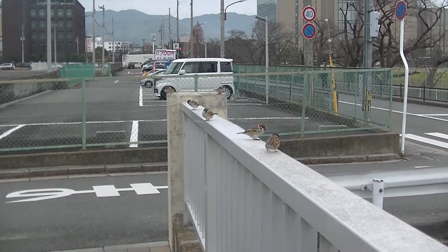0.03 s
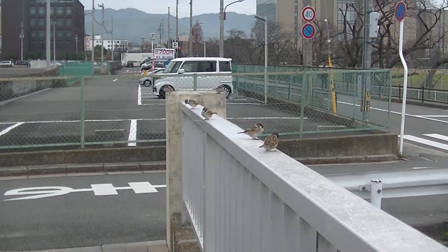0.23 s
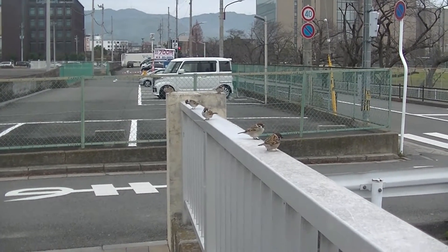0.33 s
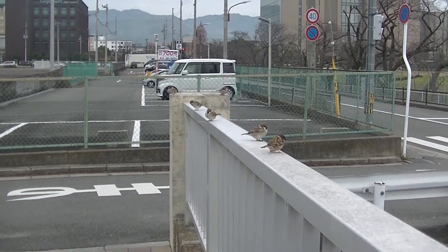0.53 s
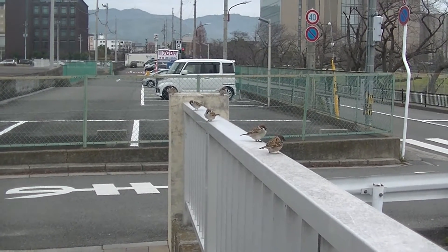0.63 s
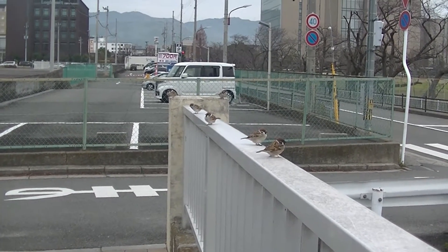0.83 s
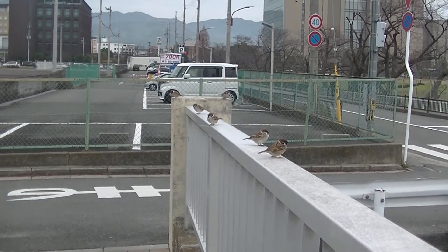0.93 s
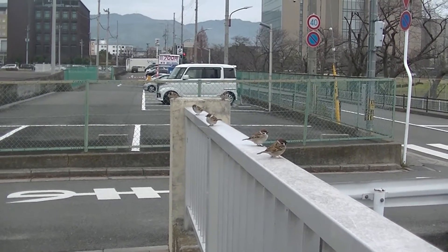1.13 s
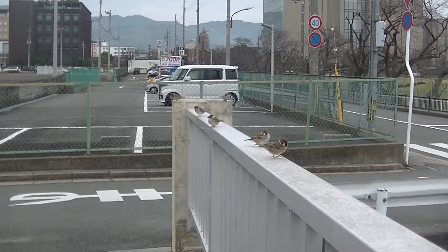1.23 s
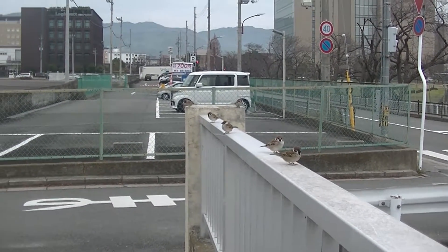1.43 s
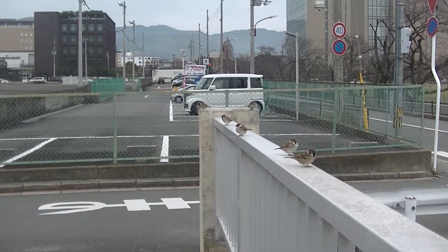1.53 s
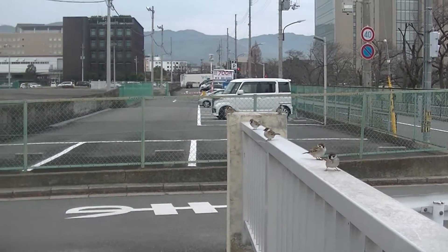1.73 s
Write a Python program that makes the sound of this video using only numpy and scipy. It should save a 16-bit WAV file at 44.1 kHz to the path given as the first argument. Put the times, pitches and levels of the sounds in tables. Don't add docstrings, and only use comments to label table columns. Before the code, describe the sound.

A nearby sparrow makes six short, rough, falling or arching chirps in under two seconds, with tiny beak ticks. Distant birds peep, a vehicle passes faintly, and steady town hum lies beneath; outdoor stereo, close bird.

```python
import sys
import numpy as np
from scipy import signal
from scipy.fft import rfft, irfft
from scipy.io import wavfile

SR = 44100
rng = np.random.default_rng(int(sys.argv[2]) if len(sys.argv) > 2 else 0)


def voltage_ratio(level):
    return 10 ** (np.asarray(level, float) / 20)


def wrap_up_sound(samples):
    columns = np.atleast_2d(samples).T
    tamed = np.clip(columns, -1, 1)
    steps = np.round(tamed * 32767).astype(np.int16)
    wavfile.write(sys.argv[1], SR, steps)


N = 79380
T = np.arange(N) / SR
BIN_HZ = np.arange(N // 2 + 1) * SR / N + 1


def rms_one(x):
    return x / np.sqrt(np.mean(np.abs(x) ** 2) + 1e-20)


def along(points, x):
    return np.interp(x, *np.transpose(points))


def along_pitch(points, hz):
    point_hz, value = np.transpose(points)
    return np.interp(np.log(hz), np.log(point_hz), value)


def tint(x, points):
    return irfft(rfft(x) * voltage_ratio(along_pitch(points, BIN_HZ)), N)


def flutter(rate_hz):
    settle = 9000
    r = np.exp(-2 * np.pi * rate_hz / SR)
    white = rng.standard_normal((2, N + settle))
    slow = signal.lfilter([1], [1, -2 * r, r * r], white[0] + 1j * white[1])
    return rms_one(slow[settle:])


def tone(hz):
    return np.exp(2j * np.pi * np.cumsum(hz + np.zeros(N)) / SR)


def sparrow():
    # [t/s, f/Hz, level/dB]
    falling = [
        [(.2125, 6517, -24), (.222, 5150, -27.5), (.24, 4710, -21.5), (.27, 4340, -27), (.3, 3797, -26),
         (.311, 2796, -33), (.324, 2254, -43)],
        [(.924, 5364, -26.5), (.936, 4470, -26.5), (.982, 3865, -22), (.99, 3600, -30.5), (1.012, 2405, -34),
         (1.024, 2000, -63)],
        [(1.193, 5260, -30.5), (1.203, 4150, -28.5), (1.232, 3948, -25.5), (1.272, 3856, -26),
         (1.288, 3200, -37.5), (1.302, 2393, -34), (1.312, 2200, -45)],
        [(1.4865, 4900, -26.5), (1.496, 4065, -27), (1.52, 3773, -22.5), (1.558, 3555, -27), (1.575, 2770, -30),
         (1.585, 2189, -44.5), (1.596, 2010, -49)],
    ]
    # [t/s, f/Hz, level/dB]
    arched = [
        [(.422, 6335, -29.5), (.429, 5050, -22.5), (.452, 4900, -18.5), (.463, 5050, -25), (.473, 5200, -21.5),
         (.488, 5263, -18), (.504, 4900, -32.5), (.512, 3620, -37), (.522, 2380, -43)],
        [(.674, 5893, -24), (.686, 4743, -24), (.712, 5070, -14.5), (.735, 5355, -16), (.752, 5000, -19.5),
         (.765, 3830, -25.5), (.771, 2300, -36.5), (.78, 1901, -45)],
    ]
    # [throat level/dB, hiss level/dB]
    breath_levels = [(-10, -19.5), (-8, -23.5), (-7, -28), (-8.5, -26.5), (-12, -19), (-8.5, -22.5)]
    # [f/Hz, level/dB per Hz]
    throat_colour = [(1200, -21.5), (2200, -6), (3000, -14.5), (3700, 1), (5000, 5.5), (6500, -5.5),
                     (7300, -27), (9000, -26)]
    # [f/Hz, level/dB per Hz]
    hiss_colour = [(5000, -30), (7500, -3), (10000, -5), (12000, 0), (13800, 4), (14800, -2), (16000, -18)]
    # [f/Hz, level/dB]
    path = [(1500, -1.5), (2300, 4), (2900, 0.5), (3350, -6), (3600, -2.5), (6600, 2), (7300, 0.5),
            (16000, -4.5)]
    # [t/s, level/dB]
    wheeze_swell = [(.235, -75), (.262, -40), (.295, -37), (.322, -63), (.33, -87)]
    attack_s, tail_hz, tail_loss_db = .0007, 4300, 9
    clear_share, rasp_limit = .35, .15
    loud_db, breath_follows = -24, .9

    hz = np.full(N, 4e3)
    gain, throat, hiss = np.zeros((3, N))
    for rows, (throat_db, hiss_db) in zip(falling + arched, breath_levels):
        s, pitch, db = np.transpose(rows)
        on = (T >= s[0]) & (T < s[-1])
        hz[on] = np.interp(T[on], s, pitch)
        attack = np.clip((T[on] - s[0]) / attack_s, 0, 1)
        gain[on] = voltage_ratio(np.interp(T[on], s, db)) * attack
        throat[on], hiss[on] = voltage_ratio(throat_db), voltage_ratio(hiss_db)

    shake_hz = .018 * hz + .24 * np.maximum(tail_hz - hz, 0)
    whistle = tone(hz + shake_hz * flutter(220).real)
    rasp = np.sqrt(clear_share) + np.sqrt(1 - clear_share) * flutter(210)
    rasp = rasp + voltage_ratio(-9) * flutter(850)
    rasp = rms_one(rasp / (1 + rasp_limit * np.abs(rasp)))

    throat_noise = throat * rms_one(tint(rng.standard_normal(N), throat_colour))
    hiss_noise = hiss * rms_one(tint(rng.standard_normal(N), hiss_colour))
    breath = voltage_ratio(loud_db) * (gain / voltage_ratio(loud_db)) ** breath_follows
    wheeze = voltage_ratio(along(wheeze_swell, T)) * (flutter(480) * tone(11800)).real

    throb = rms_one(1 + .45 * tone(230 * (1 + .35 * flutter(60).real)).imag)
    tail_loss = voltage_ratio(-tail_loss_db * np.clip(1 - hz / tail_hz, 0, 1))
    voice = np.sqrt(2) * gain * throb * tail_loss * (rasp * whistle).real
    return tint(voice + breath * (throat_noise + hiss_noise), path) + wheeze


def beak():
    # [t/s, level/dB]
    ticks = [
        (.211, -37),
        (0.42, -31),
        (.6735, -49),
        (0.9231, -28.5),
        (1.482, -28.5),
    ]
    tick_s = .0008
    burst = sum(voltage_ratio(db) * np.exp(-((T - s) / tick_s) ** 2) for s, db in ticks)
    bright = signal.butter(4, 7940, "high", fs=SR, output="sos")
    return burst * signal.sosfilt(bright, rng.standard_normal(N))


def spread(x):
    # [f/Hz, level/dB]
    bird_pan = [(1500, -1), (2600, .5), (3300, 3), (3900, 5.5), (4600, 2.5), (5200, 1.8), (8000, -1),
                (13000, -3)]
    # [f/Hz, phase/rad]
    bird_lead = [(0, 0), (3270, 0.8), (3530, 0.56), (7240, 0.5), (8440, 1.59), (10900, 0.35), (15600, 5.5),
                 (16100, 0.1)]
    hz, lead = np.transpose(bird_lead)
    turn = np.interp(np.log(BIN_HZ), np.log(np.maximum(hz, 1e-300)), lead) / 2
    turn = np.where(BIN_HZ < hz[1], lead[1] / 2, turn)
    ears = []
    for side in (1, -1):
        balanced = tint(x, [(f, side * db / 2) for f, db in bird_pan])
        ears.append(irfft(rfft(balanced) * np.exp(1j * side * turn), N))
    return np.array(ears)


def echoes(x):
    t = T[:int(.25 * SR)]
    t60_s = .07
    tail = rng.standard_normal((2, len(t))) * voltage_ratio(-60 * t / t60_s)
    tail = rms_one(tail) / np.sqrt(len(t))
    return voltage_ratio(-17) * signal.fftconvolve(x[None], tail, axes=1)[:, :N]


def hum(colour, patchy_db):
    # [f/Hz, correlation]
    likeness = [(60, .99), (500, .97), (2000, .9), (5000, .75), (9000, .3), (15000, .1)]
    # [f/Hz, level/dB]
    town_pan = [(60, -2.5), (300, -2), (1000, -1), (4000, -2), (15000, 3)]
    total = 0
    centres = 20 * 2 ** np.arange(0, 10, .5)
    inside = (centres > colour[0][0] / 1.3) & (centres < colour[-1][0] * 1.3)
    white = rfft(tint(rng.standard_normal((2, N)), colour))
    for centre in centres[inside]:
        band = np.cos(np.clip(np.log2(BIN_HZ / centre), -.5, .5) * np.pi) ** 2
        mid, side = irfft(white * band, N)
        alike = np.clip(along_pitch(likeness, centre), 0, 1)
        pair = np.sqrt(1 + alike) * mid + np.sqrt(1 - alike) * side * [[1], [-1]]
        total = total + voltage_ratio(patchy_db * flutter(6.3).real) * pair
    ears = [tint(ear, [(hz, s * db / 2) for hz, db in town_pan]) for ear, s in zip(total, (1, -1))]
    return rms_one(np.array(ears))


def vehicle():
    # [t/s, level/dB]
    swell = [
        (1.1, -58),
        (1.24, -39),
        (1.33, -39),
        (1.44, -41.5),
        (1.6, -58.5),
    ]
    # [f/Hz, level/dB per Hz]
    roar_colour = [(120, -23), (300, -9), (800, -15), (1500, -24.5), (3300, -20), (6000, -18), (7300, -31),
                   (14000, -45.5)]
    # [f/Hz on arrival, sag/Hz per s, level/dB]
    drones = [
        (303, -70, -5),
        (445, -140, -12),
    ]
    t = T - swell[1][0]
    revs = np.clip(1 + 4 * t, .7, 1)
    drone = 0
    for hz, sag, db in drones:
        waver = 1 + .5 * flutter(5)
        drone = drone + voltage_ratio(db) * (waver * tone((hz + sag * t) * revs)).real
    return voltage_ratio(along(swell, T)) * (hum(roar_colour, patchy_db=-1.0) + drone * voltage_ratio([[-1.2], [1.2]]))


def squeal():
    end_s, fade_s = .42, .05
    fade = np.clip((end_s - T) / fade_s, 0, 1)
    waver = 1 + .25 * flutter(9.0)
    return voltage_ratio(-50) * fade * (waver * np.exp(2j * np.pi * 2988 * T)).real


def far_birds():
    # [t/s, length/s, level/dB, f/Hz]
    peeps = [
        (0.02, 0.02, -60, 4400),
        (0.21, 0.032, -46, 4500),
        (0.415, 0.023, -53, 5500),
        (0.553, 0.029, -44, 4300),
        (.635, 0.045, -66, 5000),
        (0.845, 0.043, -42.5, 4000),
        (1.148, .015, -40, 3450),
        (1.706, 0.045, -46.5, 4800),
        (1.735, 0.014, -40, 3700),
    ]
    fall, pan_db = .04, -2
    total, rasp = np.zeros(N), .5 + flutter(200)
    for s, length, db, hz in peeps:
        u = (T - s) / length
        sagging = np.exp(2j * np.pi * hz * (T - fall * length * u ** 2 / 2))
        total += voltage_ratio(db) * np.exp(-4.0 * u ** 2) * (rasp * sagging).real
    return total * voltage_ratio([[pan_db / 2], [-pan_db / 2]])


def flock():
    # [f/Hz, level/dB per Hz]
    flock_colour = [(2400, -10), (3300, 11.5), (4200, -11), (5200, -6.5), (6500, -35)]
    return voltage_ratio(-65) * hum(flock_colour, patchy_db=5.0)


def town():
    # [f/Hz, level/dB per Hz]
    town_colour = [(25, -33), (117, -6), (330, -5), (820, -14.5), (1500, -17), (4500, -16), (7000, -36),
                   (16000, -45)]
    return voltage_ratio(-41.5) * hum(town_colour, patchy_db=0.8)


def scene():
    bird = sparrow() + beak()
    near = spread(bird) + echoes(bird)
    return near + vehicle() + squeal() + far_birds() + flock() + town()


def top_cut(x):
    return signal.sosfilt(signal.butter(12, 16510, fs=SR, output="sos"), x)


def record(dry):
    low_pass = signal.cheby2(10, 50, 16600, fs=SR, output="sos")
    mix = signal.sosfilt(low_pass, dry)
    return top_cut(mix)


dry = scene()
out = record(dry)
wrap_up_sound(out)
```